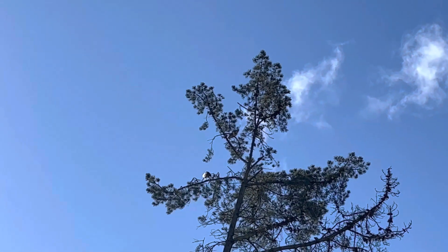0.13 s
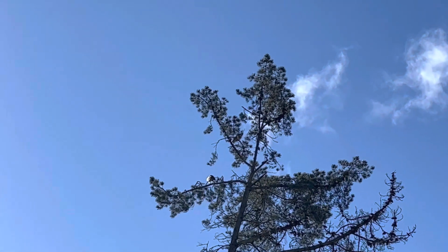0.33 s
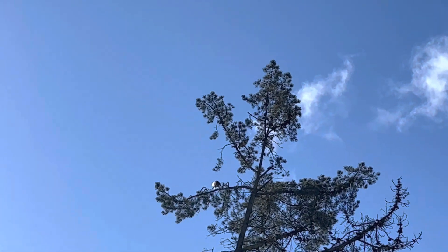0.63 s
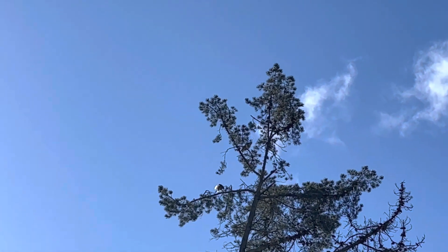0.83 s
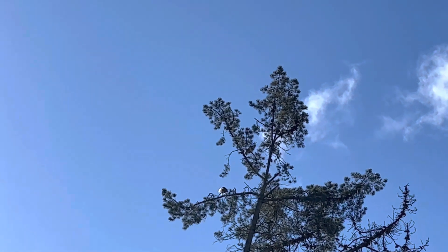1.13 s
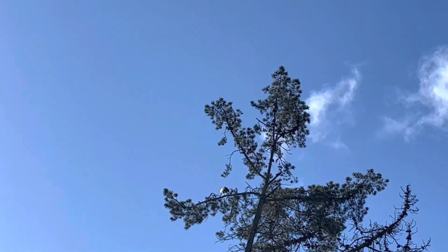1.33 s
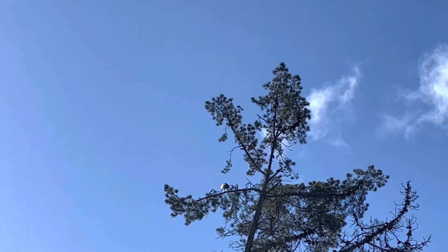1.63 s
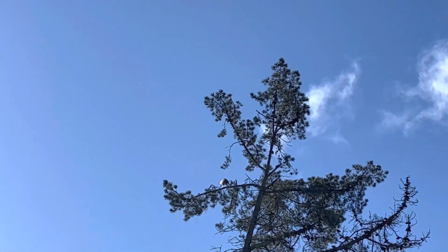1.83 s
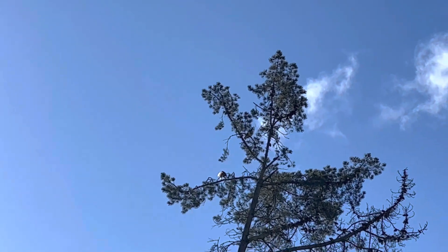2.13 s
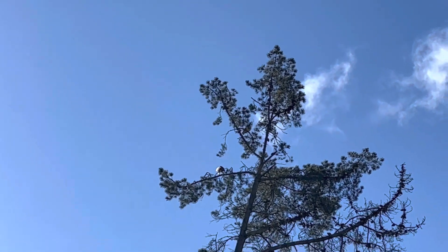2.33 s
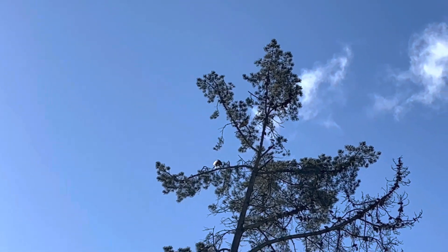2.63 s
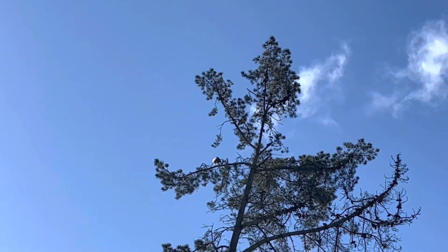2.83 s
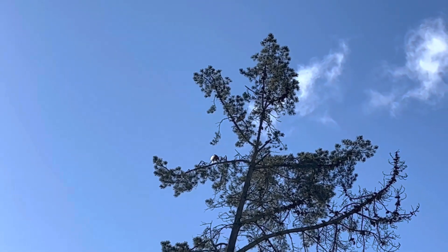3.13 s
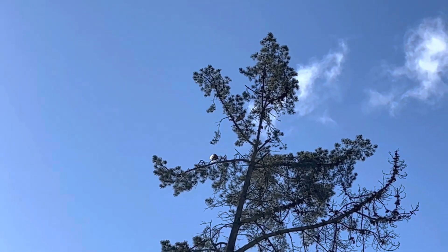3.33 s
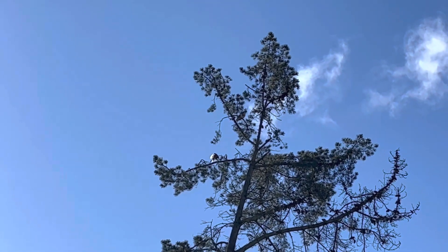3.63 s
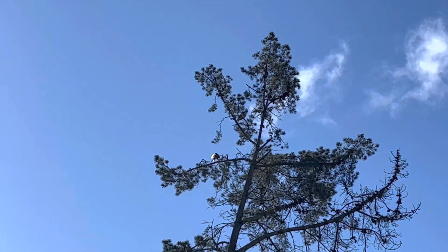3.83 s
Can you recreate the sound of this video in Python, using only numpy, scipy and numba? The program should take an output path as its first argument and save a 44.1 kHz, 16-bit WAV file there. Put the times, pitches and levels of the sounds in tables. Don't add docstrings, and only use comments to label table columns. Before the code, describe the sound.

A hawk gives one long, harsh, raspy scream outdoors over a low wind rumble.

```python
import sys
import numpy as np
from scipy import signal
from scipy.fft import rfft, irfft
from scipy.io import wavfile
from scipy.ndimage import uniform_filter1d
from numba import njit

SR = 44100
rng = np.random.default_rng(int(sys.argv[2]) if len(sys.argv) > 2 else 0)


def convert_level_to_amplitude(level_db):
    exponent = np.asarray(level_db, float) / 20
    return 10 ** exponent


def store_wav(level_fs):
    pcm = np.round(np.clip(np.atleast_2d(level_fs), -1, 1) * 32767)
    wavfile.write(sys.argv[1], SR, pcm.T.astype(np.int16))


N = 176400
HZ = np.fft.rfftfreq(N, 1 / SR)


def curve(table, col=1):
    rows = np.array(table, float)
    return np.interp(np.log(HZ + 1), np.log(rows[:, 0]), rows[:, col])


def detune(hz, width):
    f = HZ + 1
    return (f / hz - hz / f) * hz / width


def resonances(table):
    return np.sqrt(sum(convert_level_to_amplitude(2 * db) / (1 + detune(hz, width) ** 2) ** 2 for hz, width, db in table))


def shape(x, response):
    return irfft(rfft(x) * response, N)


def unit(x):
    return x / np.sqrt(np.mean(x ** 2))


def walk(rate):
    k = max(int(SR / rate), 2)
    return unit(uniform_filter1d(uniform_filter1d(rng.standard_normal(N), k), k))


# pitch_hz, level_db (per Hz)
AIR = [(22, -29.5), (45, -5.5), (150, -15), (480, -27.5), (1250, -45), (1700, -43.5), (2300, -53),
       (6800, -61.5),
       (7200, -58), (8500, -64.5), (10500, -62.5), (12500, -61.5), (13500, -91)]
# pitch_hz, width_hz, level_db
BOOMS = [(75.4, 21, 1), (119.3, 69, -7.5), (204.8, 32.5, -0.5), (238.5, 32.4, -5.5), (321.8, 29.6, -8),
         (436.5, 18, -16), (845, 300, -39), (1760, 400, -50)]
# pitch_hz, level_db
WIND_SIDE = [(60, -20), (170, -22), (280, -17.5), (480, -8), (800, -2), (1350, 2), (2260, -9.5), (6380, -4)]
# start_s, swell_db
GUST = [
    (0, -1),
    (0.497, -5.5),
    (1.199, 0.5),
    (1.798, 8),
    (2.3, -1.5),
    (3.002, -1.5),
    (4, -2),
]
GUST_HZ, GUST_OCTAVES = 415, 0.82
WIND_DB, GUST_DB, FLICKER_DB, SURGE_DB = -50, 1, -0.65, 1


def wind():
    colour = np.sqrt(convert_level_to_amplitude(curve(AIR)) ** 2 + resonances(BOOMS) ** 2)
    mid, side = rfft(rng.standard_normal((2, N))) * colour
    side = side * convert_level_to_amplitude(curve(WIND_SIDE))
    pair = np.array([mid + side, mid - side])
    gust, octave = walk(1.0), np.log2(HZ + 1)
    swell = np.interp(np.arange(N) / SR, *np.array(GUST).T)
    out = 0
    for centre in np.arange(4, 15):
        band = np.cos(np.pi / 2 * np.clip(octave - centre, -1, 1)) ** 2
        lift = swell * np.exp(-((centre - np.log2(GUST_HZ)) / GUST_OCTAVES) ** 2)
        unrest = GUST_DB * gust + FLICKER_DB * walk(19) + SURGE_DB * walk(8.4)
        depth = min(1, 400 / 2. ** centre) ** 0.12
        out = out + convert_level_to_amplitude(lift + unrest * depth) * irfft(pair * band, N)
    return unit(out) * convert_level_to_amplitude(WIND_DB)


# pitch_hz, left_minus_right_db, left_lead_rad
PORTS = [(400, -10, 2), (970, -1, .7), (1520, -6, 2.1), (2150, -5.5, 0.73), (2760, 0, 0.27),
         (4350, -1.5, -0.53), (6270, 0, -1), (9300, -3, -1.76)]
NEAR_ECHO_S, NEAR_ECHO_DB = 0.048, -7
TAIL_DB, TAIL_TOP_HZ, TAIL_LIFT_HZ, TAIL_LIFT = -7.5, 5640, 4500, 1
LEAF_HZ, LEAF_T60_S, TAIL_T60_S = 3400, 0.93, 0.99


def trees(voice):
    t = np.arange(N) / SR
    near = rng.standard_normal(N) * (rng.random(N) < .01) * np.exp(-t / NEAR_ECHO_S)
    near = convert_level_to_amplitude(NEAR_ECHO_DB) * near / np.linalg.norm(near)
    near[0] = 1
    tail = rng.standard_normal((2, N)) * (1 - np.exp(-t / 0.018)) * (t < 1.2)
    low = 1 / (1 + (HZ / LEAF_HZ) ** 8)
    tail = shape(tail, low) * convert_level_to_amplitude(-60 * t / TAIL_T60_S) + shape(tail, 1 - low) * convert_level_to_amplitude(-60 * t / LEAF_T60_S)
    tail = convert_level_to_amplitude(TAIL_DB) * tail / np.linalg.norm(tail[0])
    tone = 1 + TAIL_LIFT * np.exp(-((HZ - TAIL_LIFT_HZ) / 600) ** 2)
    tone = tone / (1 + (HZ / TAIL_TOP_HZ) ** 10)
    left = convert_level_to_amplitude(curve(PORTS) / 2) * np.exp(.5j * curve(PORTS, col=2))
    ports = np.array([left, 1 / left])
    return shape(voice, ports * (rfft(near) + rfft(tail) * tone))


# multiple (of a third of the pitch), level_db
LINES_DB = [(3, -6), (4, -15), (5, -32), (6, -36.5), (9, -29.5)]
WOBBLE = .02
UNDER_FLUTTER, SECOND_UNDERTONE_DB = .2, -6
SMEAR_DB, SMEAR_RATE, SMEAR_UP_HZ = -5.5, 1010, 149.55
SUM_HZ, SUM_DB, SUM_SMEAR_RATE = 2351, -21, 1000


def membrane_lines(hz, under_db, beak_db):
    t = np.arange(N) / SR
    third = 2 * np.pi * np.cumsum(hz * (1 + WOBBLE * walk(250))) / SR / 3
    calm = 2 * np.pi * np.cumsum(hz) / SR / 3
    under = (1 + UNDER_FLUTTER * walk(150)) * np.sin(calm)
    under = under + convert_level_to_amplitude(SECOND_UNDERTONE_DB) * walk(290) * np.sin(2 * third)
    lines = convert_level_to_amplitude(under_db) * under
    up = 2 * np.pi * SMEAR_UP_HZ * t
    for multiple, level_db in LINES_DB:
        k = round(multiple)
        line = convert_level_to_amplitude(0.5 * walk(66)) * np.sin(k * third)
        smear = convert_level_to_amplitude(SMEAR_DB) * walk(SMEAR_RATE) * np.sin(k * third + up)
        lines = lines + convert_level_to_amplitude(level_db + beak_db * (k == 5)) * (line + smear)
    sum_tone = walk(SUM_SMEAR_RATE) * np.sin(3 * third + 2 * np.pi * SUM_HZ * t)
    return lines + convert_level_to_amplitude(SUM_DB + beak_db) * sum_tone


@njit
def beats(hz, stretch, size):
    out, p, k = np.zeros(len(hz) + 1), 0., 0
    for i in range(len(hz)):
        step = hz[i] * stretch[k] / SR
        p += step
        if p >= 1:
            p, k = p - 1, k + 1
            out[i] += size[k] * p / step
            out[i + 1] += size[k] * (1 - p / step)
    return out[:-1]


# pitch_hz, width_hz, level_db
WINDPIPE = [(2407, 300, -4), (2500, 170, -4), (2950, 420, -7.5)]
# pitch_hz, width_hz, level_db
THROAT = [(725, 540, -8.5), (1100, 810, -16.5), (1397, 200, -6), (1820, 57, -11.5), (2020, 258, -2.5)]
# pitch_hz, width_hz, level_db
BEAK = [(3606, 95, -24), (4880, 760, -18.5), (5800, 1000, -29), (6080, 220, -30), (4860, 270, -27.5)]
# pitch_hz, width_hz, level_db
SPLASH = [(7950, 3100, 1.5), (9140, 560, 0.5), (11200, 870, 0.5)]
JITTER, SHIMMER_DB = .25, 4
CHOKE_HZ, CHOKE_DB_PER_KHZ = 2820, -43.5
SPLASH_DB, SPLASH_SLOPE = -62, 2.37


def rasp(hz, beak_db):
    chance = rng.standard_normal((N // 4, 2)).T
    clicks = beats(hz, np.clip(1 + JITTER * chance[0], .3, 2), convert_level_to_amplitude(SHIMMER_DB * chance[1]))
    choke = convert_level_to_amplitude(CHOKE_DB_PER_KHZ * np.maximum(hz - CHOKE_HZ, 0) / 1000)
    pipe = shape(clicks, resonances(WINDPIPE)) + choke * shape(clicks, resonances(THROAT))
    beak = convert_level_to_amplitude(beak_db) * shape(clicks, resonances(BEAK))
    splash = convert_level_to_amplitude(SPLASH_DB + SPLASH_SLOPE * beak_db) * shape(clicks, resonances(SPLASH))
    return (pipe + beak + splash) / np.std(pipe)


# start_s, pitch_hz, level_db, beak_db (opening), undertone_db, rasp_db
SCREAM = [
    (.715, 2150, -101, -17, -50, 6),
    (.742, 2464, -56, -10, -13, -0.5),
    (.78, 3302, -50.5, 10, -16, -4.5),
    (.858, 3474, -55, 20, -37, -4.5),
    (.885, 3100, -44.5, 0.5, -16.5, -11),
    (.965, 2602, -56, 8, -11, 1),
    (1.13, 2182, -54.5, 1.5, -24.5, -2.5),
    (2.735, 2046, -52.5, 0, -31, -7),
    (2.775, 2027, -80, 11, -28, -1),
]
# pitch_hz, width_hz, lift (gain)
RINGS = [(1760, 40, 1), (2065, 30, .6), (2135, 30, .9), (2194, 25, .6), (2408, 40, .8), (2547, 35, 1.6),
         (2660, 30, 1.4), (2930, 40, 1), (3311, 30, 1), (3788, 40, 1)]
DRIFT, FLUTTER_DB = .007, .5


def hawk():
    t, rows = np.arange(N) / SR, np.array(SCREAM, float).T
    hz, db, beak_db, under_db, rasp_db = (np.interp(t, rows[0], r) for r in rows[1:])
    hz = hz * (1 + DRIFT * walk(12))
    sounding = (t > rows[0, 0]) * (t < rows[0, -1])
    gain = convert_level_to_amplitude(db + FLUTTER_DB * walk(39)) * sounding
    voice = gain * membrane_lines(hz, under_db, beak_db) + gain * convert_level_to_amplitude(rasp_db) * rasp(hz, beak_db)
    ringing = 1 + sum(lift / (1 + 1j * detune(ring_hz, width)) for ring_hz, width, lift in RINGS)
    return shape(voice, ringing)


def scene():
    return trees(hawk()) + wind()


def roll_off(x):
    return signal.sosfilt(signal.butter(12, 13050, fs=SR, output="sos"), x)


# pitch_hz, level_db
MID = [(6700, -1), (7500, -10), (8100, -7.5), (8900, -17), (9200, -4)]
# pitch_hz, level_db
SIDE_KEPT = [(3000, -0.5), (3500, -33.5), (5150, -37), (5300, -0.5), (10600, -0.5), (11100, -40)]


def record(dry):
    mid = shape(dry[0] + dry[1], convert_level_to_amplitude(curve(MID))) / 2
    side = shape(dry[0] - dry[1], convert_level_to_amplitude(curve(SIDE_KEPT))) / 2
    return roll_off(np.array([mid + side, mid - side]))


dry = scene()
out = record(dry)
store_wav(out)
```